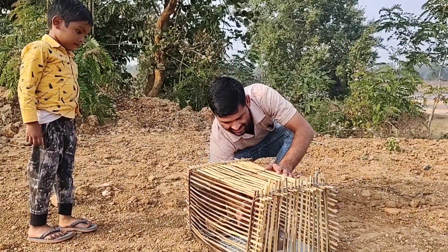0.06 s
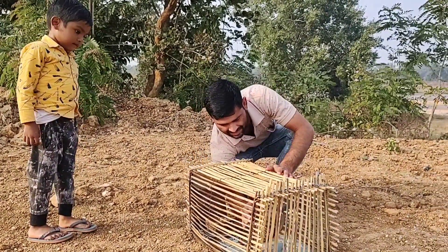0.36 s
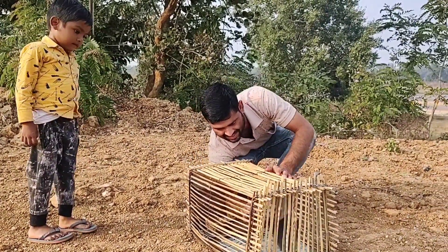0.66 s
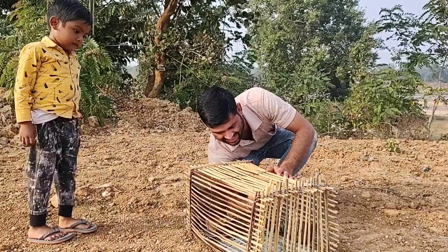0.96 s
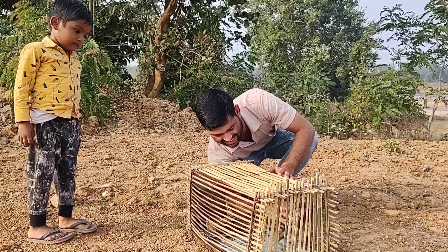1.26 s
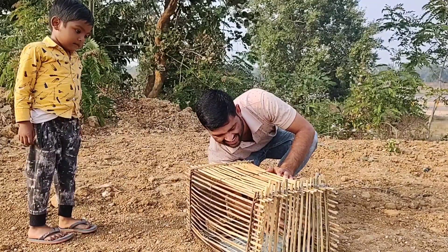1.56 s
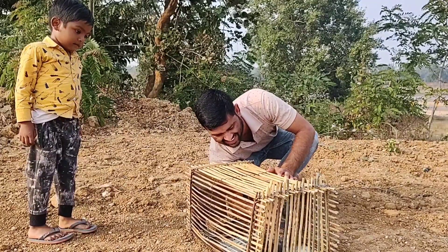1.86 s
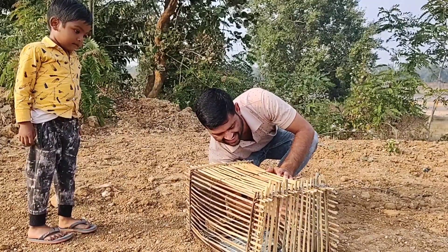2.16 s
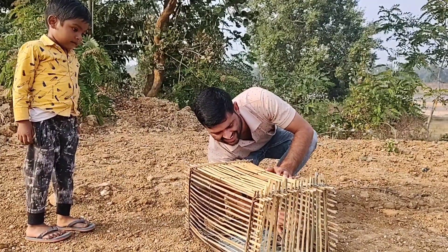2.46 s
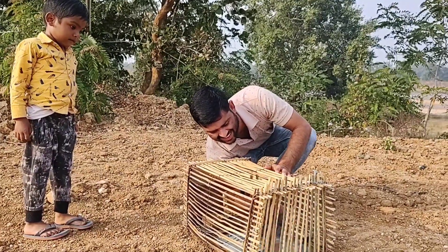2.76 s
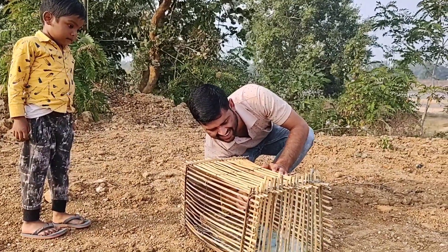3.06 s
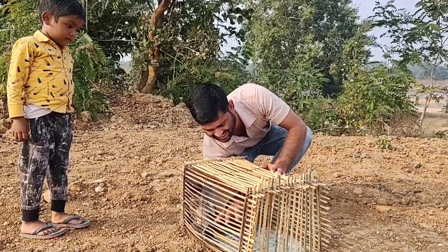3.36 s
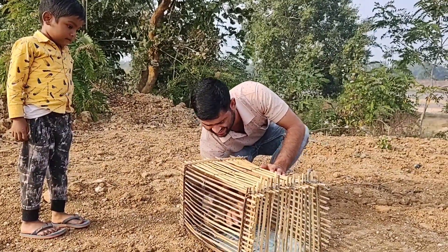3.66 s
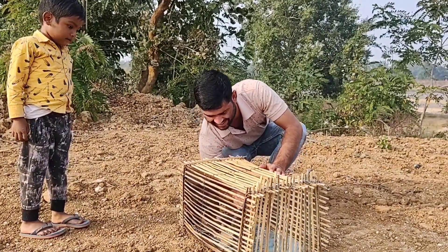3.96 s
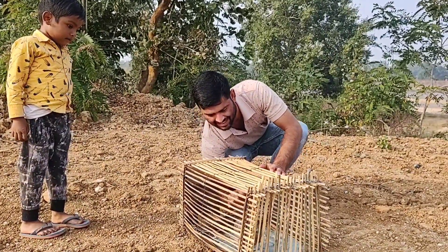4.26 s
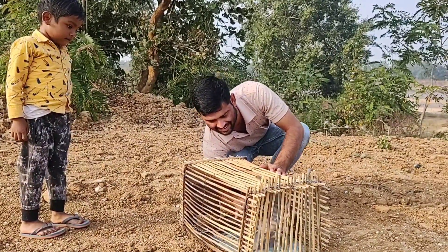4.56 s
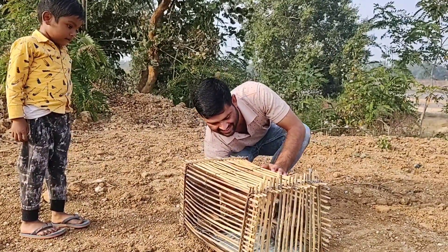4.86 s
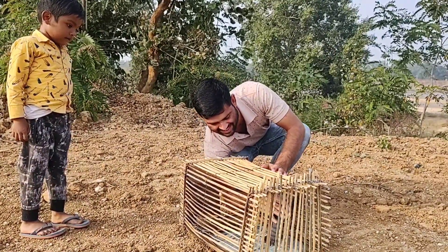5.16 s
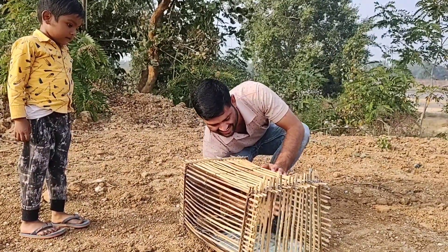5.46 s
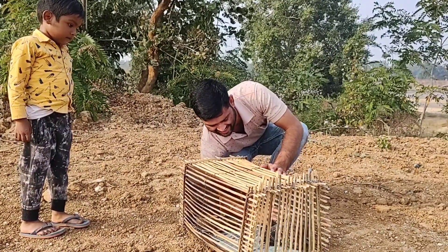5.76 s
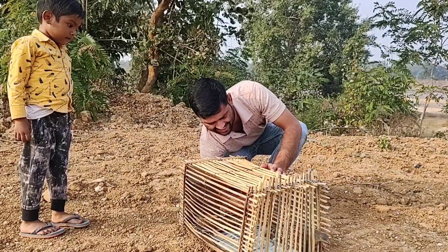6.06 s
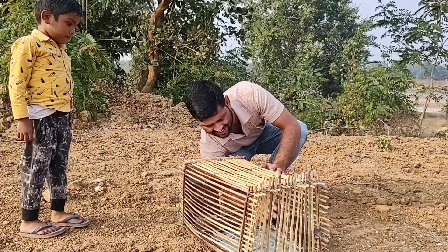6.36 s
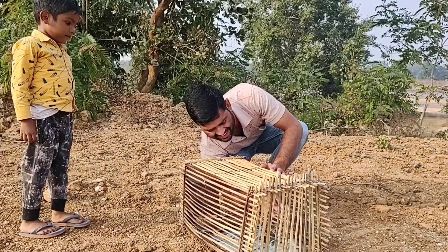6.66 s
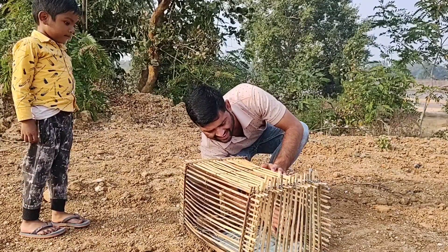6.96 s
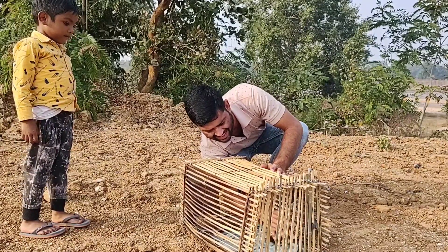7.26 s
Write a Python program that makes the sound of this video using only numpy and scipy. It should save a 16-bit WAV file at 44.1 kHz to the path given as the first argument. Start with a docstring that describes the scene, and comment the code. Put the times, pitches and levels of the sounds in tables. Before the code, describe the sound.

A cage of dry bamboo sticks is handled nearby on dry earth, over a faint, steady hush of open country. After a tiny rustle, a burst of dry rubbing and crunching comes at about 0.6 to 0.9 seconds, with a soft bump. A distant bird chirps very faintly at 0.4 and 1.3 seconds. Small crackles build to louder crunches and snaps from 1.6 to 2 seconds, and again near 2.8, ending with a dull thump. At 3.7 seconds a stick clacks sharply with a short hollow ring, followed by more crunching and several lighter woody knocks between 4.2 and 4.5. A brief crunch comes at 4.6 and a softer rustle and bump around 5.1. Then it is nearly still, with only a few ticks of loose grit, until a last cluster of dry snaps and rustles at around 7 seconds.

```python
"""Short dry rustles and crunches, with a few woody clacks, over the faint hush of open country.
Hands work in strokes in and on a cage of dry bamboo sticks that stands on dry earth.
Each stroke is a stream of tiny slips and crumbs, with sharper snaps where something gives way.
Loose sticks knock and ring, grit skips, the cage bumps the earth; a far bird chirps twice."""
import sys
import numpy as np
from scipy import signal
from scipy.fft import rfft, irfft, next_fast_len
from scipy.io import wavfile
from scipy.ndimage import uniform_filter1d

SR = 44100
rng = np.random.default_rng(int(sys.argv[2]) if len(sys.argv) > 2 else 0)


def wav_out(sig):
    """Save sig, one row per channel (or a flat mono array), as 16-bit PCM at SR to the path in sys.argv[1]."""
    wavfile.write(sys.argv[1], SR, np.round(np.clip(np.atleast_2d(sig).T, -1, 1) * 32767).astype(np.int16))


N = 321489
BLOW_SAMPLES = 3072


def undb(db):
    """Decibels to gain."""
    return 10 ** (np.asarray(db) / 20)


def decay(t, t60_s):
    """Envelope that falls 60 dB in t60_s."""
    return np.exp(-np.log(1000) * t / t60_s)


def unit_energy(x):
    """Scale to a sum of squares of 1."""
    return x / np.sqrt(np.sum(x ** 2))


def spectrum_db(points, size):
    """A (frequency [Hz], level [dB]) table on FFT bins."""
    hz, db = np.transpose(points)
    return np.interp(np.log(np.fft.rfftfreq(size, 1 / SR) + 1), np.log(hz), db)


def colour(x, points):
    """Filter by a (frequency [Hz], gain [dB]) table."""
    size = x.shape[-1]
    return irfft(rfft(x) * undb(spectrum_db(points, size)), size)


def convolve(x, response):
    """Convolve each row, keeping its length."""
    size = next_fast_len(x.shape[-1] + response.shape[-1])
    return irfft(rfft(x, size) * rfft(response, size), size)[:, :x.shape[-1]]


def walk(rate_hz):
    """Smooth random curve, spread near 1."""
    position = np.arange(N) / SR * rate_hz
    return 1.2 * np.interp(position, np.arange(8192), rng.standard_normal(8192))


def add(out, sound, time_s):
    """Mix sound into out at time_s."""
    start = max(int(time_s * SR), 0)
    out[:, start:start + sound.shape[1]] += sound[:, :max(N - start, 0)]


def blow_level(x, db):
    """Scale so the mid energy, spread over 10 ms, has this rms level."""
    return x * undb(db) / np.sqrt(np.sum(x[0] ** 2) * 100 / SR)


def stereo(mid_side, width):
    """Mid and side to left and right; the width table filters the side."""
    side = colour(mid_side[1], width)
    return np.array([mid_side[0] + side, mid_side[0] - side])


def clicks(times_s, sizes, samples):
    """Mid and side impulses; each reaches the two microphone ports by slightly different paths."""
    out = np.zeros((2, samples))
    lags_s = rng.uniform(0, 0.00027, len(times_s))
    for row, arrivals_s in zip(out, (times_s, times_s + lags_s)):
        index = np.clip((arrivals_s * SR).astype(int), 0, samples - 1)
        np.add.at(row, index, sizes * rng.choice([-1, 1], len(times_s)))
    return out


def air(level_db=-69.5, waver_db=1.3, waver_hz=6.5):
    """Even hush of fields and trees, wavering slightly."""
    # air spectrum: (frequency [Hz], level [dB])
    spectrum = [(15, -54), (25, -19), (58, -8), (97, -3), (130, -6.5), (575, -16), (911, -16),
                (2000, -17.5), (2160, -15.5), (2910, -23), (12200, -32.5), (16000, -32)]
    # stereo width: (frequency [Hz], side gain [dB])
    width = [(100, -2), (1000, -2.9), (4000, -0.5)]
    hush = colour(rng.standard_normal((2, N)), spectrum)
    return stereo(hush / np.std(hush[0]), width) * undb(level_db + waver_db * walk(waver_hz))


def bird():
    """Faint far whistles that glide up quickly, then level off."""
    # calls: (time [s], length [s], start pitch [Hz], end pitch [Hz], rms level [dB])
    chirps = [(0.43, 0.05, 2270, 2680, -72.5), (1.259, 0.083, 2170, 2450, -75)]
    out = np.zeros((2, N))
    for time_s, length_s, start_hz, end_hz, db in chirps:
        progress = np.linspace(0, 1, int(length_s * SR))
        hz = end_hz + (start_hz - end_hz) * (1 - progress) ** 2
        envelope = 2 * undb(db) * np.sin(np.pi * progress)
        add(out, np.atleast_2d(envelope * np.sin(2 * np.pi * np.cumsum(hz) / SR)), time_s)
    return out


def scatter(t60_s, db, above_hz):
    """Response of diffuse reflections; long waves pass the obstacles by."""
    t = np.arange(SR // 2) / SR
    tail = rng.standard_normal((2, len(t))) * decay(t, t60_s)
    tail = signal.lfilter(*signal.butter(2, above_hz, "high", fs=SR), tail)
    return undb(db) * tail / np.sqrt(np.sum(tail[0] ** 2))


def contact_responses():
    """One tiny dry contact: a minimum-phase click split into thud, rasp and grit."""
    # contact spectrum: (frequency [Hz], level [dB])
    spectrum = [(30, -24.5), (60, -10.5), (110, -2.5), (210, 0.5), (450, -5.5), (950, -1), (1350, 2.5),
                (1850, 0.5), (2500, -8), (3700, -21), (4800, -10.5), (6100, -13.5), (7200, -22.5),
                (9000, -14), (12500, -12), (15500, -13.5)]
    # thud, rasp and grit bands: (low edge [Hz], high edge [Hz])
    bands_hz = [(30, 600), (600, 3500), (3500, 17000)]
    cepstrum = irfft(np.log(undb(spectrum_db(spectrum, BLOW_SAMPLES))))
    cepstrum[1:BLOW_SAMPLES // 2] *= 2
    cepstrum[BLOW_SAMPLES // 2 + 1:] = 0
    click = irfft(np.exp(rfft(cepstrum)))
    filters = [signal.butter(4, band, "band", fs=SR, output="sos") for band in bands_hz]
    return [unit_energy(signal.sosfilt(sos, click)) for sos in filters]


def stick_ring(pitch_ratio, mode_count=9, spread_db=2, detune=0.016):
    """Hollow ring of a stick; modes vary with the spot struck, soft contacts reach only the lowest."""
    # stick modes: (frequency [Hz], level [dB], t60 [s])
    modes = [(948, -10, 0.13), (1245, -19, 0.06), (1494, 4, 0.051), (1787, -20, 0.035), (2270, -7, 0.076),
             (3325, -1.5, 0.049), (4654, -2, 0.034), (5500, -4, 0.028), (6050, 3, 0.014)]
    t = np.arange(BLOW_SAMPLES) / SR
    hz, db, t60_s = np.transpose(modes[:mode_count])[:, :, None]
    level_draw, pitch_draw = rng.standard_normal((2, mode_count, 1))
    tones = np.sin(2 * np.pi * hz * pitch_ratio * (1 + detune * pitch_draw) * t)
    partials = undb(db + spread_db * level_draw) * tones * decay(t, t60_s)
    return unit_energy(partials.sum(axis=0))


def effort(attack_s=0.012, release_db_per_s=591, settle_db=-14.5, settle_db_per_s=74):
    """Hand push as (time [s], rasp [dB], grit [dB]): strokes grip, hold and stop; crumbs settle."""
    # strokes over sticks and earth: (start [s], length [s], rasp [dB], grit re rasp [dB])
    strokes = [(0.03, 0.062, -60, -27), (0.572, 0.062, -60, -1), (0.631, .13, -51.5, -5.5),
               (0.752, .055, -45, -1), (0.807, .035, -45, -23), (1.42, .035, -58, -3.5),
               (1.488, 0.16, -54.5, -1.5), (1.671, .025, -51.5, -1), (1.745, 0.12, -49, -6),
               (1.854, .145, -45, -4.5), (2.64, .04, -52.5, -1.5), (2.794, .175, -44.5, -4),
               (2.945, .05, -46, -10.5), (3.414, .12, -54, -4), (3.615, .08, -53, 1.5),
               (3.71, .04, -40, -3), (3.747, .135, -49, -14), (3.876, .035, -43, -9.5),
               (3.93, .04, -57, -4), (4.033, .035, -59, -3.5), (4.185, .07, -54.5, -11),
               (4.606, .065, -46, -5), (4.718, .045, -59.5, -5.5), (4.913, .025, -65, 1.5),
               (5.06, .025, -63, 2), (5.101, .06, -57, 1), (5.191, 0.036, -61.5, -4.5),
               (6.983, 0.069, -56.5, -13.5), (7.133, .05, -52, -13), (7.224, .025, -51.5, -22)]
    # hands resting on the cage: (time [s], rasp [dB], grit re rasp [dB])
    light_touch = [(0, -63.5, -7), (.53, -70, -13.5), (.95, -62, -9.5), (1.28, -70, -0.5), (2.18, -64, -4),
                   (2.48, -78, -6), (2.721, -60, 1), (3.101, -69.5, 0), (3.38, -72.5, 2.5), (3.6, -66, 1),
                   (4.12, -62, -6.5), (4.4, -67, -8.5), (4.55, -63, -1.5), (4.9, -69.5, -2), (5.4, -71, -2),
                   (6.0, -79, -8), (6.85, -84, -9), (7.12, -66, 3)]
    t = np.arange(0, N, 64) / SR
    start_s, length_s, db, grit_db = np.transpose(strokes)[:, :, None]
    rise = np.clip((t - start_s) / attack_s, 0, 1)
    after_s = np.maximum(t - start_s - length_s, 0)
    fall_db = np.maximum(-release_db_per_s * after_s, settle_db - settle_db_per_s * after_s)
    push = rise * undb(db + fall_db)
    touch_s, touch_db, touch_grit_db = np.transpose(light_touch)
    touch = undb(np.interp(t, touch_s, touch_db))
    rasp = np.vstack([push, touch])
    grit = np.vstack([push * undb(grit_db), touch * undb(np.interp(t, touch_s, touch_grit_db))])
    return t, 20 * np.log10(np.linalg.norm(rasp, axis=0)), 20 * np.log10(np.linalg.norm(grit, axis=0))


def loose_grit(responses, skip_span_s=0.0084, fade_db=-14, skips=6):
    """A grain drops and skips, ever more weakly; treble only."""
    # lone grains: (time [s], level [dB])
    grains = [(0.251, -64), (2.454, -59.5), (2.584, -65.5), (5.558, -63), (5.75, -62.5), (6.762, -68.5),
              (7.099, -56.5)]
    _, _, grit = responses
    out = np.zeros((2, N))
    for time_s, db in grains:
        age = np.r_[0, rng.uniform(0, 1, skips)]
        hops = clicks(age * skip_span_s, undb(fade_db * age), BLOW_SAMPLES)
        add(out, blow_level(convolve(hops, grit), db), time_s)
    return out


def bumps(bump_hz=130, t60_s=0.062):
    """The cage rocks on the earth: a low, damped thump, mid only."""
    # soft landings: (time [s], level [dB])
    landings = [(0.781, -51), (2.907, -46), (5.142, -50.5)]
    out, t = np.zeros((2, N)), np.arange(BLOW_SAMPLES) / SR
    thump = np.outer([1, 0], np.sin(2 * np.pi * bump_hz * t) * decay(t, t60_s))
    for time_s, db in landings:
        add(out, blow_level(thump, db), time_s)
    return out


def ticking(tick_db=-8, spread_db=2, lowest_ratio=0.46, count=130):
    """Sticks of different length nudge each other, harder and more often as the hands rub harder."""
    t, effort_db, _ = effort()
    travel = np.cumsum(undb(effort_db))
    out = np.zeros((2, N))
    for k, (jitter, stick, force) in enumerate(rng.uniform(0, 1, (count, 3))):
        i = np.searchsorted(travel, travel[-1] * (k + jitter) / count)
        ring = stick_ring(lowest_ratio ** stick, mode_count=4)
        tap = np.outer([1, rng.choice([-1, 1])], ring)
        add(out, blow_level(tap, effort_db[i] + tick_db + spread_db * (2 * force - 1)), t[i])
    return out


def clacks(responses, thud_db=-15, rasp_db=0, grit_db=-13, chatter_gain=0.55, rebounds=14):
    """A stick strikes, chatters against its neighbour and rings; the frame thuds dully."""
    # stick on stick: (time [s], level [dB], pitch [ratio], chatter time scale [s])
    strikes = [(3.7093, -32, 1.02, 0.0021), (3.721, -42, 1.1, 0.0023), (3.739, -37, 1.0, 0.0038),
               (4.1804, -49.5, 0.96, 0.0046), (4.198, -44.5, 0.98, 0.0014), (4.356, -47, 1.05, 0.0025),
               (4.364, -45, 1.0, 0.0071), (4.45, -48, 0.94, 0.0053)]
    out = np.zeros((2, N))
    for time_s, db, pitch_ratio, chatter_s in strikes:
        age = np.r_[0, rng.uniform(0, 2, rebounds)]
        taps = clicks(age * chatter_s, np.r_[1, chatter_gain * np.exp(-age[1:] / 2)], BLOW_SAMPLES)
        parts = zip([stick_ring(pitch_ratio), *responses], [0, thud_db, rasp_db, grit_db])
        clack = sum(blow_level(convolve(taps, response), part_db) for response, part_db in parts)
        add(out, blow_level(clack, db), time_s)
    return out


def crunches(responses, lead_s=0.0052, lead_gain=0.94, snap_gain=2.84, fade=0.81, breaks=90,
             stick_gain=0.27, frame_gain=0.16, frame_hz=200, frame_t60_s=0.06):
    """Something dry gives way: build-up, snap, then fading small breaks; a stick and the frame ring."""
    # snaps: (time [s], shower time scale [s], rasp [dB], thud re rasp [dB], grit re rasp [dB])
    snaps = [(0.045, 0.0082, -58, -16, -5), (0.639, 0.0043, -44, -6, 0), (0.668, 0.012, -46, 0.5, -8),
             (0.723, 0.0055, -52, -7, -1.5), (0.781, .007, -49, 3.5, -0.5), (0.795, 0.0019, -45, 4, -3),
                         (0.8683, 0.0029, -47.5, -0.5, -5.5), (0.956, 0.0068, -55.5, -2, -30),
             (1.032, 0.0029, -50, -12, -9), (1.1243, 0.0066, -54.5, -5.5, -5.5),
             (1.248, 0.0033, -58, -4, -2.5), (1.333, 0.013, -57, 2.5, -1),
             (1.4295, 0.0037, -50.5, -4.5, -9.5), (1.639, 0.0017, -42, -8, 1.5),
             (1.7483, 0.0028, -44.5, -0.5, -3.5), (1.7782, 0.00092, -35, -23, -5.5),
             (1.858, .005, -38, -3.5, -8), (1.868, 0.0075, -36.5, -4.5, -2.5),
             (1.926, 0.013, -43, -0.5, -8), (1.9707, 0.0018, -36.5, -32, -11.5),
             (2.0586, 0.0081, -51, -1.5, -2.5), (2.32, 0.011, -59, -17, -5.5), (2.763, 0.0015, -51, -5, 6),
             (2.796, 0.0073, -39, -5.5, 2), (2.817, 0.0035, -37, -9, -2),
             (2.9114, 0.0027, -32.5, -3.5, -10), (3.312, 0.0068, -54.5, -7, -4),
             (3.433, 0.0022, -43, -15, -13), (3.5224, 0.0037, -46.5, -3, -16), (3.741, .009, -45, 1.5, -14),
             (3.7771, 0.0098, -42, -8, -3.5), (3.893, .018, -38, -25, -14), (3.952, 0.0068, -44, -15, -9.5),
             (4.622, .002, -40.5, -10, -3), (4.66, 0.0029, -49, -19, -10), (5.143, 0.0096, -58, 5.5, 8.5),
             (5.183, 0.0044, -51.5, -4, -2.5), (6.029, .012, -62.5, -9, -23),
             (6.922, 0.0085, -62, 0.5, -17), (7.019, 0.0017, -44.5, 7, -10.5),
             (7.0281, 0.0029, -39, -8, -15.5), (7.1512, .002, -43, 5, -15.5),
             (7.172, 0.0047, -48.5, -1, -17), (7.2164, 0.0043, -45.5, -4, -9.5)]
    out, t = np.zeros((2, N)), np.arange(BLOW_SAMPLES) / SR
    thud, rasp, grit = responses
    knock = np.sin(2 * np.pi * frame_hz * t) * decay(t, frame_t60_s)
    hollow = thud + frame_gain * unit_energy(knock)
    for time_s, shower_s, rasp_db, thud_db, grit_db in snaps:
        age, build = rng.uniform(0, 2.5, breaks), rng.uniform(0, 1, breaks // 3)
        lead_sizes = lead_gain * build * rng.standard_normal(len(build))
        break_sizes = rng.standard_normal(breaks) * np.exp(-fade * age)
        times_s = np.r_[build * lead_s, lead_s, lead_s + age * shower_s]
        shower = clicks(times_s, np.r_[lead_sizes, snap_gain, break_sizes], BLOW_SAMPLES)
        woody = rasp + stick_gain * stick_ring(rng.uniform(0.62, 1.1), mode_count=5)
        parts = zip((hollow, woody, grit), (rasp_db + thud_db, rasp_db, rasp_db + grit_db))
        crunch = sum(blow_level(convolve(shower, response), db) for response, db in parts)
        add(out, crunch, time_s - lead_s)
    return out


def rubbing(responses, thud_db=-4, spread_db=2, slip_hz=160, slip_db=3, count=40000):
    """Thousands of grains a second, bunched by stick and slip; the hand's push sets their mean power."""
    sizes = undb(spread_db * np.minimum(rng.exponential(size=count), 5))
    grains = clicks(rng.uniform(0, N / SR, count), sizes, N) * undb(slip_db * walk(slip_hz))
    grains /= np.sqrt(uniform_filter1d(grains[0] ** 2, size=2600) + 1e-9)  # unit power over 59 ms
    effort_s, rasp_db, grit_db = effort()
    t = np.arange(N) / SR
    gains = [undb(np.interp(t, effort_s, db)) for db in (rasp_db + thud_db, rasp_db, grit_db)]
    return sum(convolve(grains * gain, response) for gain, response in zip(gains, responses))


def scene():
    """The cage, quick reflections off its bars and the ground, a weak tree echo, air and a bird."""
    # stereo width of the cage: (frequency [Hz], side gain [dB])
    width = [(60, -21), (250, -21.5), (700, -16.5), (1400, -11), (2400, -4.5), (4400, -0.5)]
    responses = contact_responses()
    cage = rubbing(responses) + ticking() + crunches(responses) + clacks(responses)
    cage += loose_grit(responses) + bumps()
    bars = scatter(t60_s=0.03, db=-7.5, above_hz=2000)
    trees = scatter(t60_s=0.47, db=-31, above_hz=220)
    return stereo(cage + convolve(cage, bars + trees), width) + air() + bird()


def record(dry, top_hz=15750):
    """Each microphone port has its own colour; a steep low-pass cuts the top."""
    # port imbalance: (frequency [Hz], left minus right [dB])
    imbalance = [(700, 0), (1300, 2), (2400, -4.5), (4400, 5.5), (8000, 2), (14000, 0.5)]
    lean_db = spectrum_db(imbalance, N) / 2
    ports = irfft(rfft(dry) * undb(np.array([lean_db, -lean_db])), N)
    return signal.sosfilt(signal.ellip(10, 0.2, 70, top_hz, fs=SR, output="sos"), ports)


dry = scene()
out = record(dry)
wav_out(out)
```